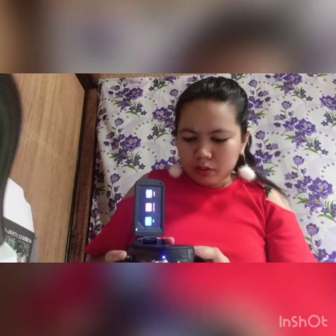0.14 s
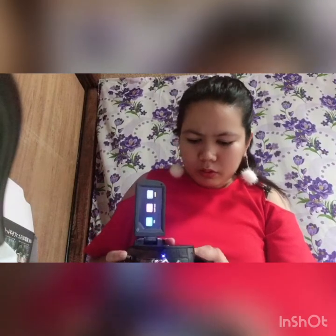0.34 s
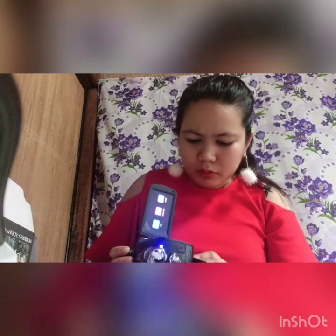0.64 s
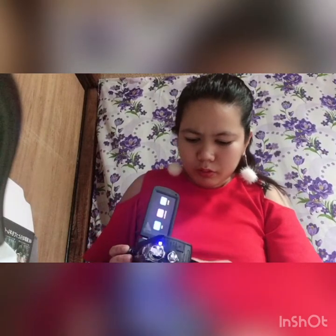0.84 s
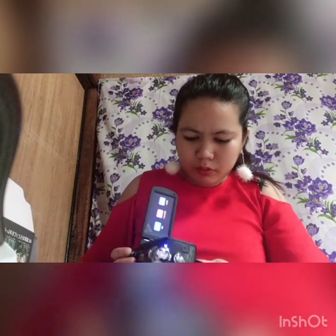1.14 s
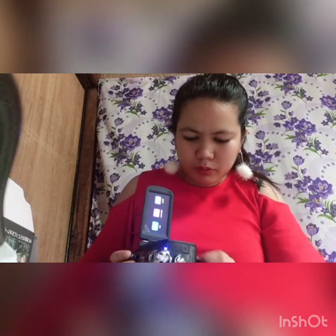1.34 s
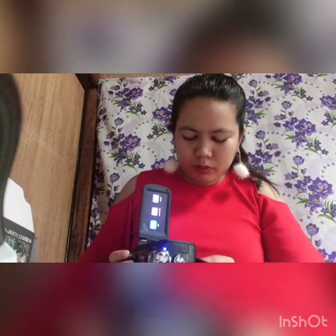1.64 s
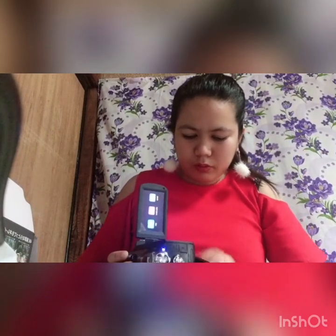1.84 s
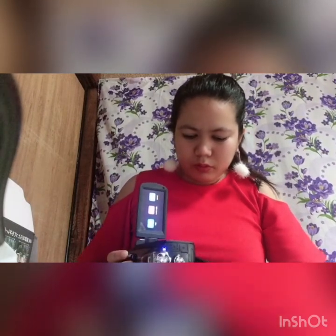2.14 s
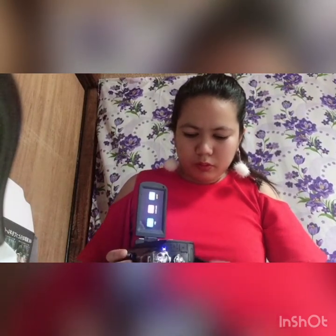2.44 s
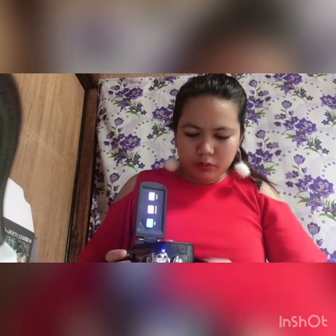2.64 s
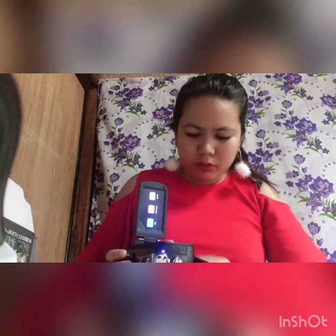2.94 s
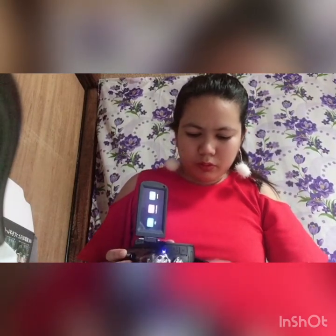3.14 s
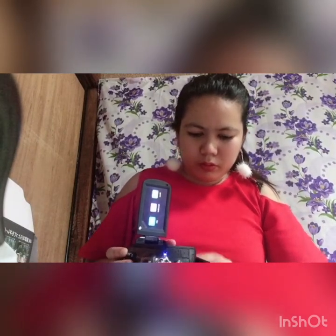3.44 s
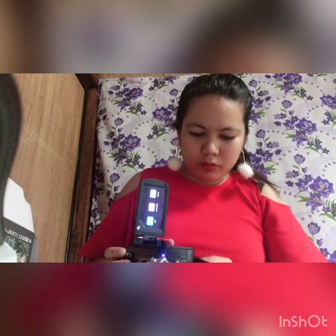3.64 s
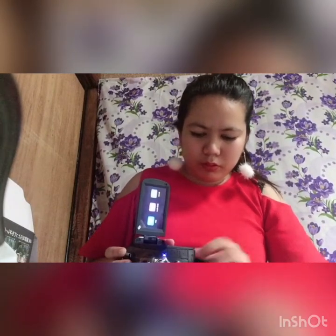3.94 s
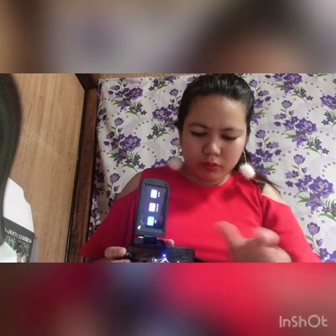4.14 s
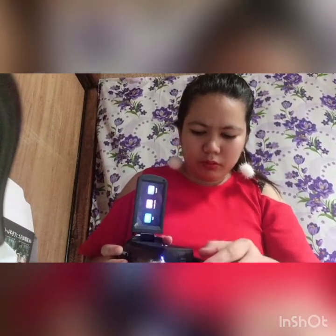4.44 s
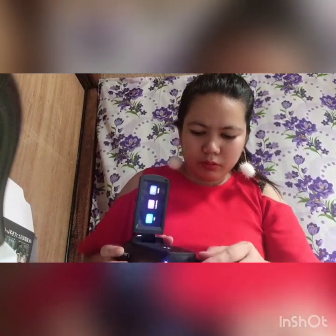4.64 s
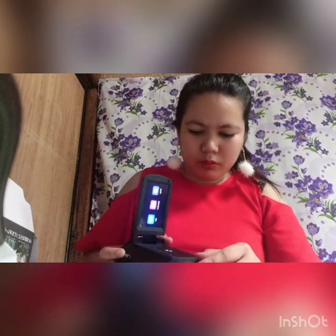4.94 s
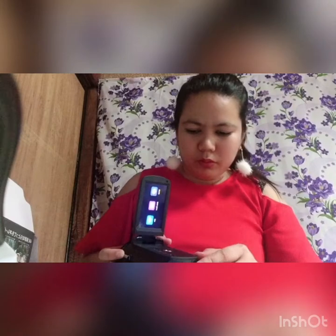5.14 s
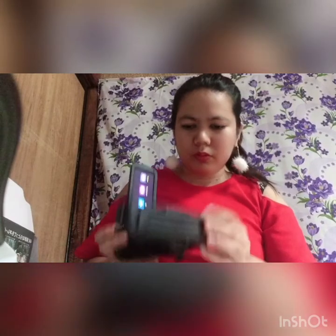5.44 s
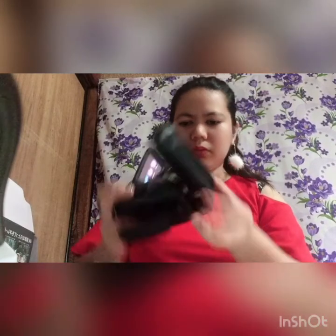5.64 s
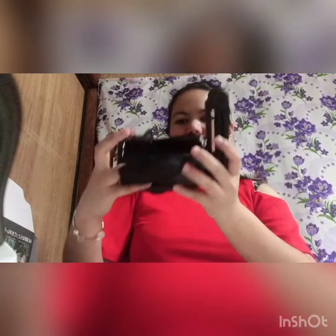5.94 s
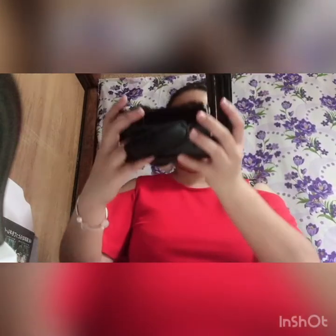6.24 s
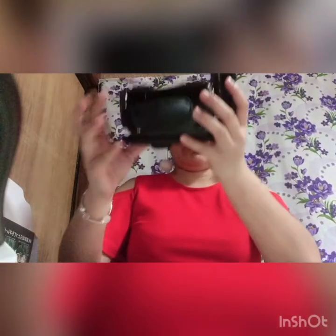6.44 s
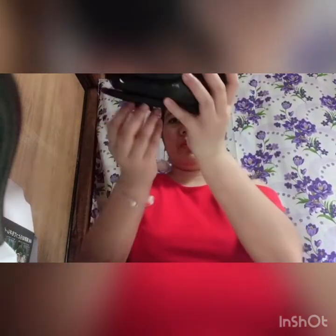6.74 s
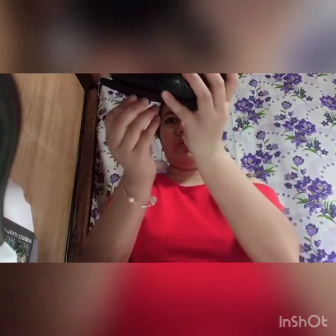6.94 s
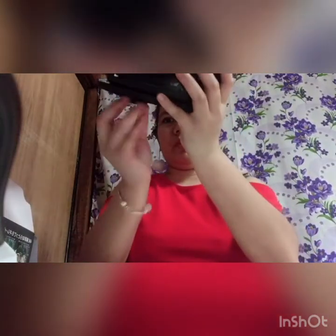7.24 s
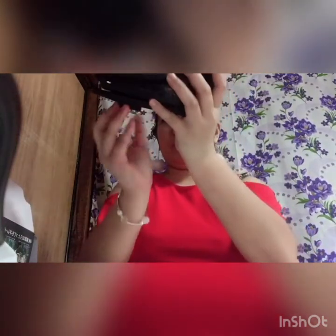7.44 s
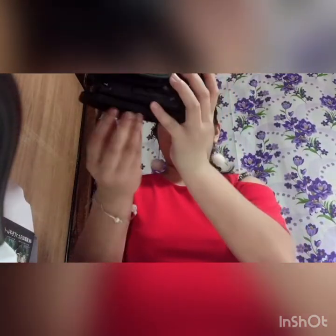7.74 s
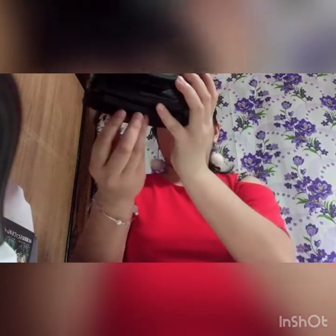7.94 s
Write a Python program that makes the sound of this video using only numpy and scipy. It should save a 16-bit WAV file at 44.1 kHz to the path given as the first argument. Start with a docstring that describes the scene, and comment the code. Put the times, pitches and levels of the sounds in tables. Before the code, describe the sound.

Plastic clicks, scrapes and woody knocks as a small camera is fiddled with on a table, loudest near the middle, then almost quiet.

```python
"""Knocks of a plastic camera and its mount on a wooden table: each sends a dispersive bending pulse
through the board, on which the microphone lies, and sets its decaying modes ringing.
Latches and edges click as short bursts of resonant noise; fingers and plastic rub as dense random
slips that drive the resonances of board and shell, with a rustle of skin and cloth.
A short dull reverberation follows, and a small quiet room hisses underneath as steady shaped noise."""
import sys
import numpy as np
from scipy import signal
from scipy.fft import rfft, irfft
from scipy.io import wavfile

SR = 44100
rng = np.random.default_rng(int(sys.argv[2]) if len(sys.argv) > 2 else 0)


def log_audio(samples):
    """Write samples as a 16-bit WAV file to the path given in sys.argv[1]."""
    # one column per channel
    frames = np.atleast_2d(samples).T
    # limit to full scale, then quantise
    limited = np.clip(frames, -1, 1)
    pcm = np.round(limited * 32767).astype(np.int16)
    wavfile.write(sys.argv[1], SR, pcm)


N = 356857

# Spectrum of the room's hiss. Each row: frequency in Hz, relative density in dB per Hz.
HISS_SPECTRUM = [(18, -92.5), (30, -38), (95, -21), (124, -7.5), (321, -2.5), (357, -6.5), (516, -9),
                 (558, -3.5), (786, -9), (1110, -10), (1200, -14), (1520, -14), (1830, -17), (13200, -31),
                 (16200, -46)]
# Spectrum of skin and cloth rustle. Each row: frequency in Hz, relative density in dB per Hz.
RUSTLE_SPECTRUM = [(2350, -10.5), (4000, 5), (5280, -4.5), (6000, -2.5), (7840, -1.5), (13800, -13),
                   (16000, -13)]
# Modes of the wooden board. Each row: frequency in Hz, relative level in dB, undamped decay time t60 in s.
BOARD_MODES = [(178, -8.5, 0.13), (244, -30.5, 0.053), (319, -8.5, 0.2), (332.7, -4.5, 0.16),
               (394.8, -3, 0.1), (436.2, -8, 0.15), (480.6, 0, 0.066), (546, -5, 0.11), (588, 3.5, 0.029),
               (652.5, 1, 0.039), (704, -2, 0.073), (769, -3, 0.094), (842, -3.5, 0.1), (908, 2.5, 0.042),
               (1121, -4.5, 0.035), (1169, -7, 0.032), (1336, -15, 0.063), (1417, -10.5, 0.056),
               (1590, -8.5, 0.03), (1688, -14, 0.032), (1880, -19.5, 0.03), (2056, -22.5, 0.05)]
# Resonances of the plastic shell. Each row: frequency in Hz, width of one resonator in Hz, relative level in dB.
SHELL_RESONANCES = [(1437, 210, -3), (1965, 1000, 2.5), (2435, 444, -3.5), (3380, 1020, 2),
                    (4080, 520, -14.5), (4970, 400, -12), (5800, 590, -10), (7080, 720, -11),
                    (8300, 1200, -17.5), (11000, 2160, -16), (13800, 2600, -33)]
# Strokes of fingers and plastic. Each row: peak time in seconds, rise in s, fall in s, drag on the board in dB,
# favoured board mode in Hz, plastic scrape in dB, favoured shell resonance in Hz, skin and cloth rustle in dB
# (levels before the gain of each layer).
STROKES = [(.1, 0.13, 0.11, -50.5, 445, -65, 1910, -86), (.375, 0.05, 0.025, -58, 397, -61.5, 1820, -67),
           (0.421, 0.025, 0.027, -41, 580, -48, 2160, -88), (.63, 0.11, 0.035, -57, 407, -69, 1680, -89),
           (.694, 0.0068, 0.011, -43, 800, -50, 1470, -85), (0.732, 0.016, 0.048, -49, 690, -55, 1520, -76),
           (0.87, 0.062, 0.12, -50.5, 460, -51, 1510, -65.5),
           (0.922, 0.03, 0.028, -46, 363, -87, 1970, -75), (1.109, 0.18, 0.1, -51.5, 580, -56.5, 1580, -73),
           (1.214, 0.026, 0.024, -72, 322, -61, 1660, -82), (1.296, 0.027, 0.016, -55, 364, -63, 2100, -62),
           (1.394, 0.024, 0.17, -45, 357, -65, 1610, -80),
           (1.511, 0.062, 0.029, -42, 410, -57, 1760, -66.5),
           (1.773, 0.015, 0.049, -50.5, 370, -64, 1550, -87),
           (1.822, 0.018, 0.019, -64, 366, -55.5, 1900, -83),
           (1.935, 0.015, 0.17, -56, 596, -81, 1450, -92), (2.061, 0.09, 0.013, -47, 367, -56.5, 1880, -69),
           (2.276, 0.013, 0.026, -55.5, 456, -51, 1620, -72),
           (2.335, 0.061, 0.03, -43.5, 390, -58, 1900, -66),
           (2.368, 0.025, 0.025, -55, 390, -46, 2400, -55), (2.626, 0.015, 0.07, -37, 365, -51, 1810, -70),
           (2.69, 0.016, 0.028, -39.5, 383, -44.5, 2100, -62.5),
           (2.998, 0.047, 0.0073, -38, 670, -49, 1940, -56.5),
           (3.336, 0.046, 0.037, -48.5, 410, -48.5, 2260, -82),
           (3.455, 0.05, 0.033, -57, 520, -82, 2330, -72), (3.525, 0.14, 0.036, -51, 500, -97, 1870, -85),
           (3.652, 0.043, 0.048, -50, 560, -54, 2120, -67.5), (4.0, 0.032, 0.11, -65, 564, -63, 3600, -79),
           (4.255, 0.046, 0.12, -62.5, 340, -64.5, 6040, -60),
           (4.28, 0.059, 0.062, -79, 340, -66.5, 8200, -64), (4.275, .08, .06, -78, 340, -76, 11300, -70),
           (4.33, 0.053, 0.024, -37.5, 296, -56.5, 3160, -66.5),
           (4.335, 0.07, 0.087, -71, 340, -59, 5500, -75.5), (4.395, 0.11, 0.04, -54, 344, -38, 5680, -70),
           (4.39, .1, .04, -77, 340, -52.5, 4700, -81.5), (4.4, .09, .04, -75.5, 340, -53, 7300, -79),
           (4.39, 0.066, 0.065, -53.5, 370, -41.5, 3360, -56),
           (4.425, 0.051, 0.022, -36, 502, -51, 2380, -58),
           (4.521, 0.0089, 0.022, -45, 446, -59, 1980, -80),
           (4.559, 0.037, 0.021, -45, 418, -41.5, 1490, -79),
           (4.62, 0.082, 0.15, -55, 447, -55.5, 2250, -69.5),
           (4.715, 0.024, 0.031, -54, 520, -62, 2960, -87),
           (4.826, 0.058, 0.078, -32, 346, -51.5, 1940, -56.5),
           (4.545, .04, 0.033, -73, 400, -51, 3600, -73.5), (4.9, .02, 0.024, -60, 300, -75, 1840, -69),
           (4.948, 0.036, 0.11, -50, 435, -73, 2150, -77), (5.166, 0.031, 0.066, -53, 350, -76, 1780, -89),
           (5.632, 0.012, 0.096, -64, 605, -62.5, 1740, -64.5),
           (5.69, 0.07, 0.12, -78, 550, -63, 11200, -72), (5.76, 0.069, 0.11, -79, 550, -62, 2800, -69),
           (5.811, 0.027, 0.033, -50, 797, -41, 2420, -60), (5.832, 0.035, 0.011, -40, 790, -49, 2000, -75),
           (6.32, 0.067, 0.065, -69, 447, -62.5, 2650, -65),
           (6.98, 0.085, 0.11, -61, 810, -62, 10500, -76.5),
           (7.165, 0.044, 0.067, -60, 845, -54.5, 10700, -76),
           (7.245, 0.057, 0.056, -75, 800, -60, 10500, -80),
           (7.286, 0.1, 0.088, -60, 694, -59.5, 1960, -68),
           (7.97, 0.021, 0.16, -55.5, 654, -62.5, 1850, -72),
           (8.082, 0.0083, 0.017, -49, 872, -44, 1470, -62)]
# Plastic clicks. Each row: start in seconds (before the fixed offset), body peak in dB, pitch in Hz,
# bright edge in dB relative to the body, decay time t60 of the body in s.
CLICKS = [(0.0828, -44, 1840, -29, 0.018), (0.109, -42, 1820, -35, 0.025), (0.2258, -47, 1720, -29, 0.022),
          (0.277, -52.5, 2290, -18, 0.056), (0.421, -37, 2320, -20, 0.0033), (0.43, -45, 2420, -35, 0.019),
          (0.4977, -19, 1970, -10, 0.017), (0.5079, -33, 2040, -16, 0.025), (0.513, -58, 1750, -21, 0.03),
          (0.5933, -51, 1850, -29, 0.016), (0.6465, -48.5, 1500, -25, 0.03), (0.734, -48, 1835, -25, 0.04),
          (0.9325, -15, 4040, -21, 0.016), (0.963, -30.5, 1800, -9, 0.059), (1.053, -33.5, 1980, -7, 0.047),
          (1.271, -45.5, 2380, -26, 0.018), (1.3001, -47.5, 1850, -32, 0.1),
          (1.3449, -38, 2440, -19, 0.011), (1.3828, -44.5, 1830, -24, 0.019),
          (1.695, -37, 1900, -10, 0.039), (1.926, -51, 1810, -27, 0.019), (1.986, -52.5, 1890, -18, 0.034),
          (2.27, -46.5, 1890, -25, 0.04), (2.277, -57, 3300, -25, 0.017), (2.333, -43.5, 1890, -24, 0.042),
          (2.358, -48, 2000, -30, 0.033), (2.3665, -35, 2730, -25, 0.027), (2.368, -38, 9000, -30, 0.0086),
          (2.6152, -42.5, 2370, 2.5, 0.019), (2.649, -56, 2380, -20, 0.024), (2.683, -49, 2200, -20, 0.03),
          (2.6912, -47, 2480, -29, 0.026), (2.705, -59, 1950, -25, 0.033), (2.899, -46.5, 1760, -23, 0.15),
          (2.998, -30, 2070, -32, 0.075), (3.23, -48.5, 1920, -1, 0.028), (3.261, -35.5, 1770, -8, 0.02),
          (3.3584, -43, 1910, -30, 0.014), (3.723, -27, 2850, -17, 0.022), (4.301, -38.5, 1780, -16, 0.037),
          (4.371, -41, 3280, -12, 0.03), (4.4393, -13, 1910, -1, 0.022), (4.456, -34, 1780, -8, 0.073),
          (4.5189, -37, 2850, -29, 0.054), (4.669, -59, 1880, 4, 0.021), (4.6932, -21.5, 4000, -20, 0.015),
          (4.694, -43, 3040, -30, 0.064), (4.698, -39, 1300, -35, 0.1), (4.763, -54, 2160, -39, 0.032),
          (4.7755, -34, 1820, -10, 0.042), (4.8528, -20, 2540, -5.5, 0.024), (4.864, -47, 2210, 9, 0.038),
          (4.885, -49.5, 1880, 9, 0.028), (4.94, -45, 1900, -12, 0.029), (4.949, -47.5, 2030, -25, 0.018),
          (4.961, -50, 2000, -22, 0.015), (4.98, -53, 2020, -25, 0.019), (5.255, -34, 3100, -25, 0.018),
          (5.3223, -53, 1960, -6, 0.019), (5.533, -47.5, 1630, -17, 0.031), (5.581, -51, 1840, -29, 0.016),
          (5.612, -50.5, 1660, -23, 0.033), (5.6364, -48.5, 4470, -6, 0.028),
          (5.791, -42.5, 2000, -8, 0.043), (5.802, -37, 2380, -25, 0.041), (5.8732, -47.5, 910, -28, 0.015),
          (7.787, -54, 2510, -18, 0.02), (7.926, -51, 2680, -29, 0.032), (7.9413, -54, 2120, -21, 0.025),
          (7.987, -54, 2700, -21, 0.02)]
# Knocks on the board. Each row: time of the crest in seconds, crest level of the pulse in dB,
# time constant of the contact in ms, favoured mode in Hz, ring in dB relative to the crest,
# boost of the favoured mode in dB.
KNOCKS = [(0.229, -47, 0.24, 560, -4.5, 2), (0.4253, -27.5, 0.059, 337, -15, 3),
          (0.5001, -8, 0.18, 600, -11, 9), (0.6967, -34.5, 0.08, 840, -18, 4),
          (0.964, -10, 0.2, 333, -10.5, 6.5), (1.059, -21, 0.36, 330, -5.5, -1),
          (1.3123, -16.5, 0.29, 317, -12, 8.5), (1.7022, -28.5, 0.37, 395, -14, 22.5),
          (1.931, -42, 0.14, 390, -11, 8.5), (2.0676, -46, 0.55, 342, -1.5, 16),
          (2.3633, -28, 0.31, 393, -20, 28.5), (2.4703, -45.5, 0.15, 328, -10, 2),
          (2.6225, -32, 0.26, 385, -17.5, 6), (2.6894, -41.5, 0.35, 392, -6, 14),
          (2.7125, -38.5, 0.47, 387, -6, 15.5), (2.918, -22, 0.4, 348, -7.5, 4.5),
          (3.0102, -16.5, 0.29, 343, -10, 6), (3.089, -27.5, 0.45, 337, -5, 4),
          (3.263, -15, 0.29, 317, -9, 2.5), (3.4521, -38, 0.48, 314, -24, 2),
          (3.7263, -10, 0.27, 324, -11, -0.5), (3.8468, -32.5, 0.56, 325, -2.5, 7.5),
          (3.991, -41.5, 0.21, 587, -18, 7), (4.3261, -32.5, 0.42, 323, -1, 4),
          (4.3739, -26.5, 0.32, 323, -5.5, 7.5), (4.4114, -30.5, 0.29, 892, -7.5, 9.5),
          (4.4414, -0.7, 0.21, 1130, -11.5, 9), (4.567, -22, 0.42, 320, -4, 3.5),
          (4.7784, -12.5, 0.29, 330, -11, 8.5), (4.8603, -22.5, 0.43, 326, -22, 11),
          (5.1736, -59, 0.81, 385, -3, 6), (6.1974, -41, 0.22, 447, -19, 11),
          (6.333, -47, 0.2, 285, -15, 4), (6.74, -40, 0.2, 577, -14, 2)]

HISS_DB = -62
ROOM_T60_S, ROOM_DB = 0.17, -16.5
STOPBAND_HZ = 16300
BASS_LEAK_DB = -15   # slow push that still reaches the microphone through the table

SWELL_DB = 20.5   # a stroke is this much down one rise or fall from its peak
SWELL_CURVE = 1.3   # exponent: 1 pointed, 2 round
CLUMP_DB, CLUMP_HZ = 2, 147   # unevenness of friction and the upper limit of its rate

CLICK_OFFSET_S = .0005   # fixed offset added to every click's tabulated start
SOFT_DB, HARD_DB = -50, -22   # clicks grow sharper and broader from the one level to the other
SOFT_RISE_S = 0.00074   # time constant of a soft touch
SOFT_SPAN, HARD_SPAN = 1.56, 1.83   # reach of the snap around its pitch, as a ratio

BEND_DELAY_S = .0004   # travel time through the board at 500 Hz
DAMPED_AFTER_S = .075   # the hand settles and stills the board
DETUNE = 0.012   # random spread of each mode's pitch from knock to knock, as a share


def amp(db):
    """Level and amplitude: 20 dB make a factor of ten."""
    return 10 ** (np.asarray(db) / 20)


def rms_one(x):
    """Normalisation of mean power: the rms becomes 1."""
    return x / np.sqrt(np.mean(x ** 2) + 1e-20)


def passed(x, hz, kind, order=2):
    """Butterworth filtering: a maximally flat passband."""
    return signal.sosfilt(signal.butter(order, hz, kind, fs=SR, output="sos"), x)


def ring(x, hz, t60):
    """Damped resonance: a unit impulse excites a decaying sine of initial height about 1."""
    radius = amp(-60 / (t60 * SR))
    angle = 2 * np.pi * hz / SR
    feedback = [1, -2 * radius * np.cos(angle), radius * radius]
    return signal.lfilter([0, np.sin(angle)], feedback, x + 1e-18)


def coloured(spectrum):
    """Spectral shaping of white noise, interpolated over log frequency; rms 1."""
    hz, db = np.transpose(spectrum)
    axis = np.maximum(np.fft.rfftfreq(N, 1 / SR), 1)
    gain = amp(np.interp(np.log(axis), np.log(hz), db))
    return rms_one(irfft(rfft(rng.standard_normal(N)) * gain, N))


def grains(per_s, spread_db):
    """Friction as a random train of micro-impacts of uneven size and either sign; rms 1."""
    sizes = amp(spread_db * np.minimum(rng.exponential(1, N), 4))
    signs = rng.choice([-1, 1], N)
    return rms_one(sizes * signs * (rng.random(N) < per_s / SR))


def favour(hz, favoured_hz, boost_db):
    """Modal excitation: the place of contact drives the modes near one pitch harder."""
    return amp(boost_db * np.exp(-(np.log(hz / favoured_hz) / 0.23) ** 2))


def add(out, s, sound):
    """Superposition: mix a short sound in at time s."""
    at = round(s * SR)
    out[at:at + len(sound)] += sound[:N - at]


def hiss():
    """Stationary noise: the quiet room's steady spectrum."""
    return amp(HISS_DB) * coloured(HISS_SPECTRUM)


def room(x):
    """Reverberation as convolution with a short dull tail: decaying noise that starts after 3 ms."""
    t = np.arange(SR // 4) / SR
    decay = amp(-60 * t / ROOM_T60_S) * (t > .003)
    tail = passed(rng.standard_normal(len(t)) * decay, [600, 2600], "band", order=1)
    return signal.fftconvolve(x, tail / np.sqrt(np.sum(tail ** 2)))[:N]


def strokes():
    """Incoherent addition: strokes swell and die by one rule, favour nearby resonances, and sum in power."""
    board_hz, shell_hz = np.array(BOARD_MODES)[:, :1], np.array(SHELL_RESONANCES)[:, :1]
    drag, scrape = np.zeros((len(BOARD_MODES), N)), np.zeros((len(SHELL_RESONANCES), N))
    rustle = np.zeros(N)
    for s, rise, fall, drag_db, on_board_hz, scrape_db, on_shell_hz, rustle_db in STROKES:
        first = max(int((s - 3 * rise) * SR), 0)
        last = min(int((s + 3 * fall) * SR), N)
        on = slice(first, last)
        t = np.arange(first, last) / SR - s
        swell = amp(-SWELL_DB * np.where(t < 0, -t / rise, t / fall) ** SWELL_CURVE)
        board_gain = amp(drag_db) * favour(board_hz, on_board_hz, boost_db=20.0)
        shell_gain = amp(scrape_db) * favour(shell_hz, on_shell_hz, boost_db=10.0)
        drag[:, on] += board_gain ** 2 * swell ** 2
        scrape[:, on] += shell_gain ** 2 * swell ** 2
        rustle[on] += (amp(rustle_db) * swell) ** 2
    return np.sqrt(drag), np.sqrt(scrape), np.sqrt(rustle)


def rubbing():
    """Friction-driven resonance: dense slips excite board and shell, with a noise of skin and cloth."""
    drag, scrape, rustle = strokes()
    slips = grains(per_s=900, spread_db=1.5)
    board = np.zeros(N)
    for k, (hz, db, t60) in enumerate(BOARD_MODES):
        sign = (-1) ** k
        # 0.31: the modes ring shorter here than the table's t60
        board += sign * amp(db) * ring(slips * drag[k], hz, 0.31 * t60)
    # the surfaces catch and let go
    unevenness = rms_one(passed(rng.standard_normal(N), CLUMP_HZ, "low"))
    grit = rms_one(grains(per_s=5700, spread_db=5.5) * amp(CLUMP_DB * unevenness))
    shell = np.zeros(N)
    for (hz, width, db), gain in zip(SHELL_RESONANCES, scrape):
        t60 = np.log(1000) / (np.pi * width)
        resonance = ring(ring(grit, hz, t60), hz, t60)
        shell += amp(db) * gain * rms_one(resonance)
    return amp(-32.0) * board + amp(-13.5) * shell + amp(-0.5) * rustle * coloured(RUSTLE_SPECTRUM)


def clicks():
    """Transient excitation: decaying noise in a broad resonance, a shorter bright edge, a brief shell ring."""
    out, size = np.zeros(N), 4000
    t = np.arange(size) / SR
    noises = rng.standard_normal((len(CLICKS), 2, size))
    for (s, db, hz, edge_db, t60), noise in zip(CLICKS, noises):
        hard = np.clip((db - SOFT_DB) / (HARD_DB - SOFT_DB), 0, 1)
        span = SOFT_SPAN + (HARD_SPAN - SOFT_SPAN) * hard
        rise_s = SOFT_RISE_S * (1 - hard) + 1 / SR
        noise = noise * (1 - np.exp(-t / rise_s))
        burst = noise[0] * amp(-60 * t / t60)
        body = passed(burst, [hz / span, hz * span], "band")
        own_note = ring(burst, hz, t60=0.014)
        body = body / np.abs(body).max() + amp(-30) * own_note
        body = body / np.abs(body).max()
        edge = passed(noise[1] * amp(-60 * t / (0.38 * t60)), [3500, 10000], "band")
        edge = edge / np.abs(edge).max()
        add(out, s + CLICK_OFFSET_S, amp(db) * (body + amp(edge_db) * edge))
    shell = sum(amp(db) * ring(out, hz, t60=0.012) for hz, width, db in SHELL_RESONANCES)
    return passed(out + amp(-35.5) * shell, 6700, "low", order=1)


def knocks():
    """Dispersion and modal decay: one bending pulse, treble first, whose modes start nearly in step."""
    out, size = np.zeros(N), 12000
    axis, t = np.fft.rfftfreq(size, 1 / SR), np.arange(size) / SR
    # bending waves: speed grows as the root of frequency
    bending = np.exp(-4j * np.pi * BEND_DELAY_S * np.sqrt(500 * axis))
    hz, level_db, t60 = np.transpose(BOARD_MODES)[:, :, None]
    spread = rng.standard_normal((len(KNOCKS), 3, len(BOARD_MODES), 1))
    returning = 1 - np.exp(-(t / 0.004) ** 2)   # reflections return
    damping = np.exp(-(t / DAMPED_AFTER_S) ** 3.6)
    for knock, (strength, lag, shift) in zip(KNOCKS, spread):
        s, db, contact_ms, favoured_hz, ring_db, boost_db = knock
        tau = contact_ms / 1000
        # the stiff board passes little slow force
        push = passed(t ** 3 * np.exp(-t / tau), 550, "high")
        pulse = irfft(rfft(push) * bending, size)
        crest = pulse.argmax()
        pulse = pulse / pulse[crest]
        # a long contact leaves the upper modes quiet
        soft = (1 + (2 * np.pi * hz * tau) ** 2) ** -.75
        gain = amp(level_db + ring_db + 2.4 * strength) * soft * favour(hz, favoured_hz, boost_db)
        phase = 2 * np.pi * hz * (1 + DETUNE * shift) * t + .5 * lag - .6
        modes = np.sum(gain * amp(-60 * t / t60) * np.cos(phase), axis=0)
        pulse[crest:] += (modes * damping * returning)[:size - crest]
        add(out, s - crest / SR, amp(db) * pulse)
    return out


def scene():
    """Radiation and superposition: the handling sounds lose deep bass, gain a room tail and join the hiss."""
    touch = rubbing() + clicks() + knocks()
    near = passed(touch, 150, "high", order=5)   # small things radiate little deep bass
    near = near + amp(BASS_LEAK_DB) * passed(touch, 95, "low")
    return (near + amp(ROOM_DB) * room(near) + hiss())[None]


def record(dry):
    """Band limitation: a steep low-pass, 70 dB down from the stopband edge upward."""
    return signal.sosfilt(signal.cheby2(12, 70, STOPBAND_HZ, fs=SR, output="sos"), dry)


dry = scene()
out = record(dry)
log_audio(out)
```